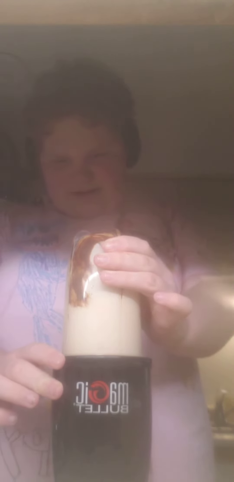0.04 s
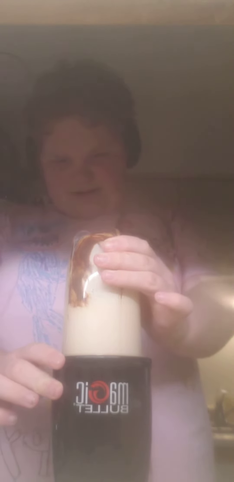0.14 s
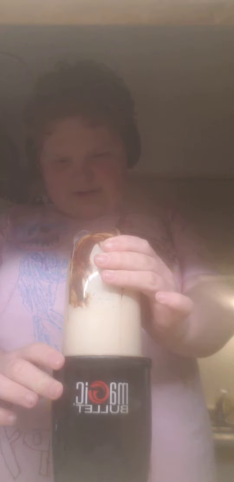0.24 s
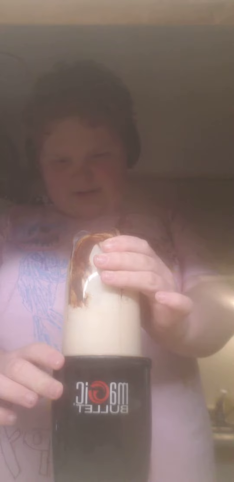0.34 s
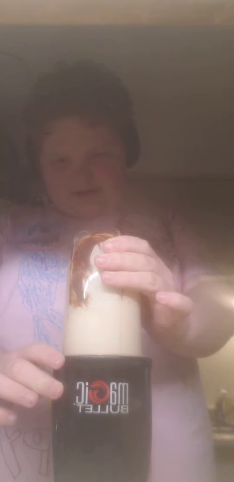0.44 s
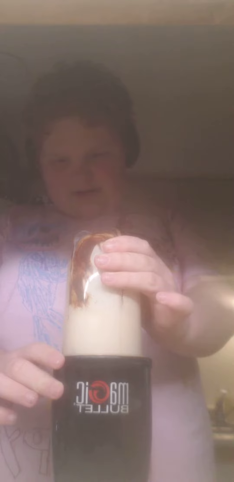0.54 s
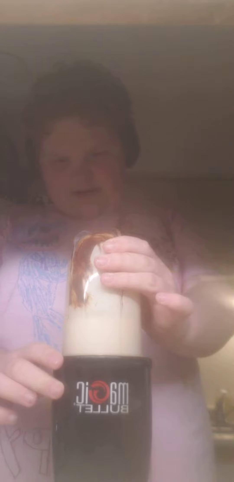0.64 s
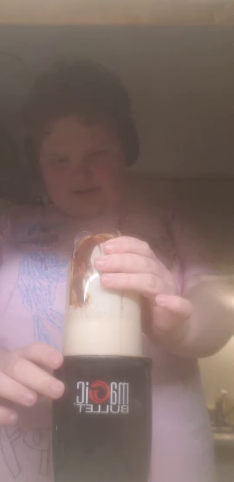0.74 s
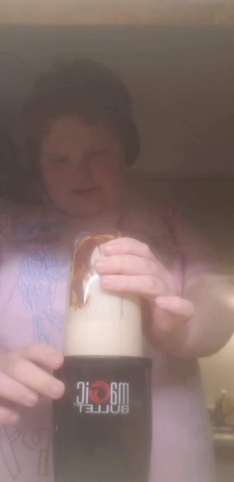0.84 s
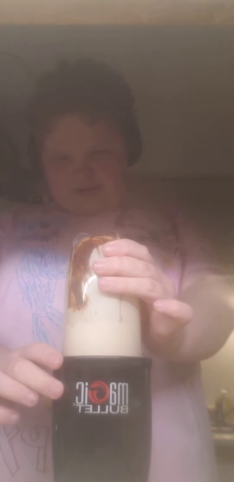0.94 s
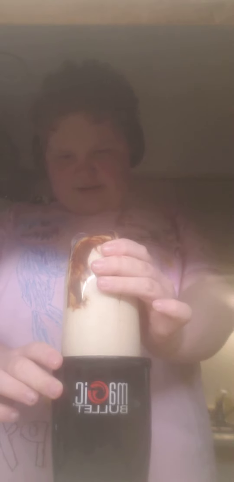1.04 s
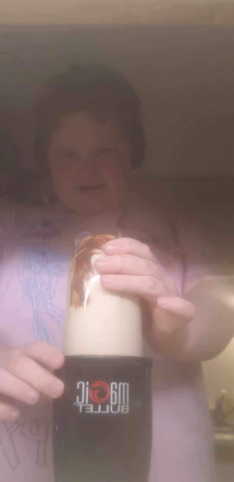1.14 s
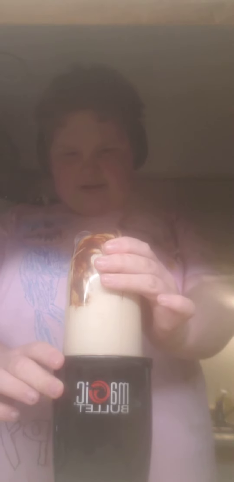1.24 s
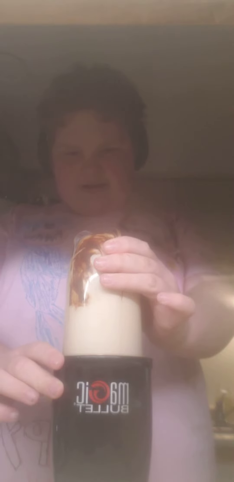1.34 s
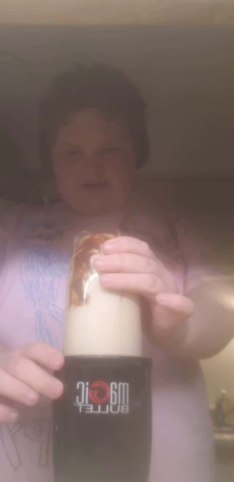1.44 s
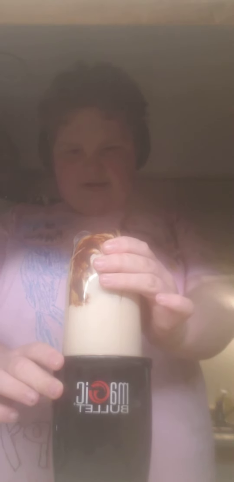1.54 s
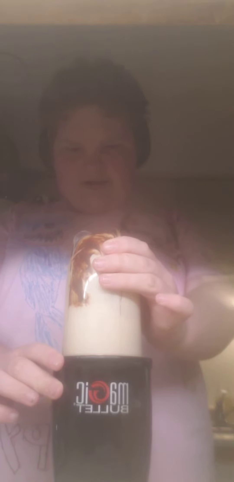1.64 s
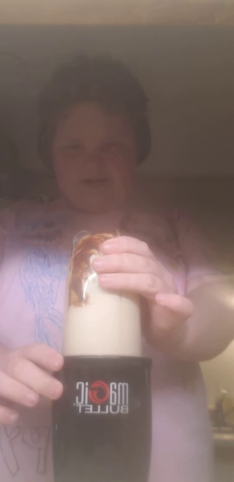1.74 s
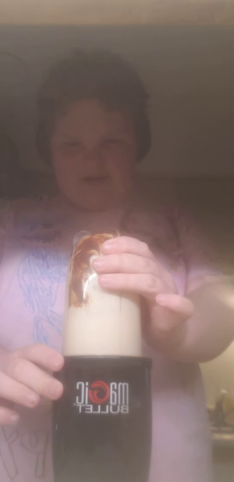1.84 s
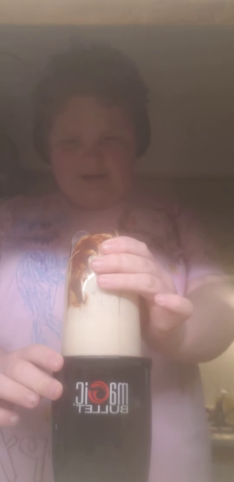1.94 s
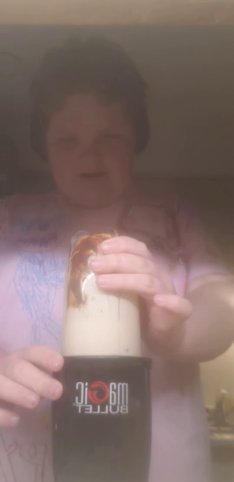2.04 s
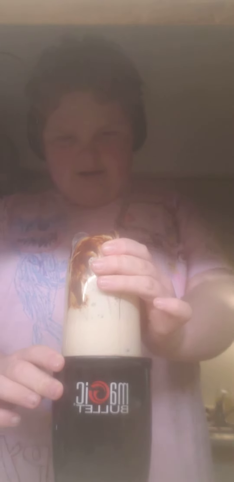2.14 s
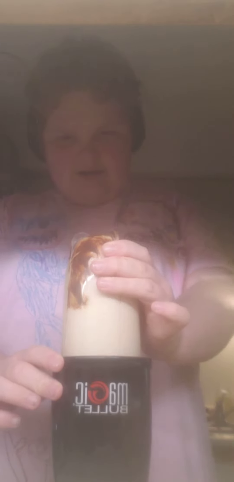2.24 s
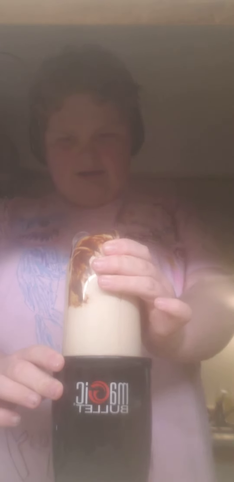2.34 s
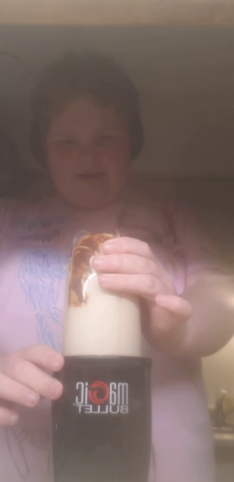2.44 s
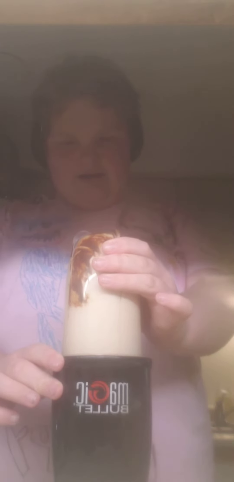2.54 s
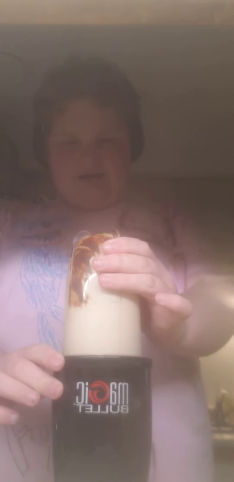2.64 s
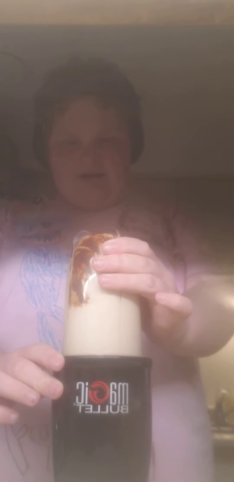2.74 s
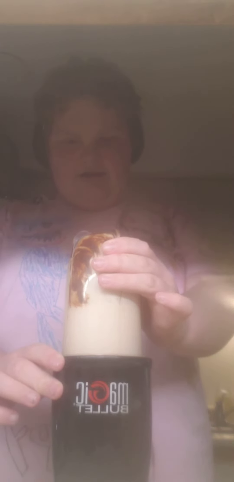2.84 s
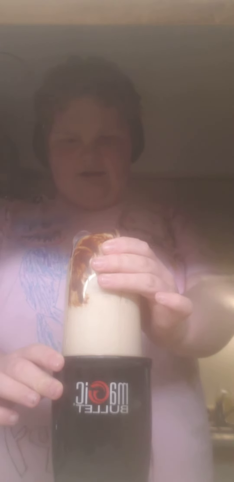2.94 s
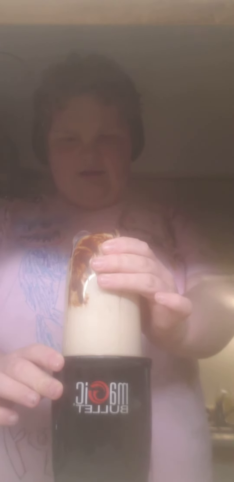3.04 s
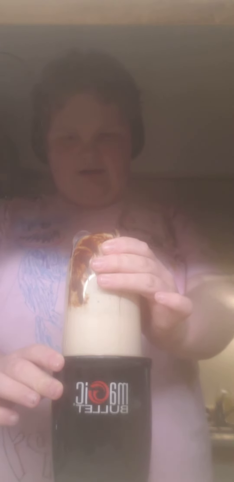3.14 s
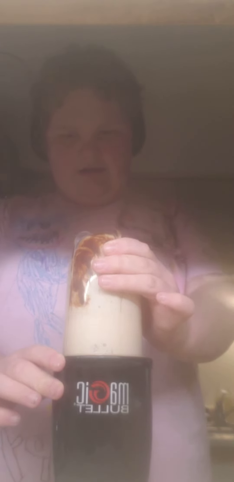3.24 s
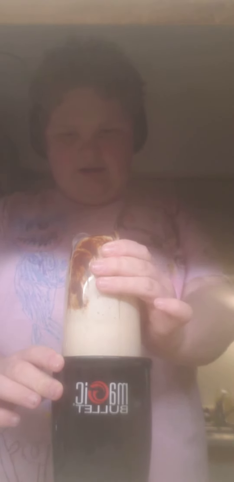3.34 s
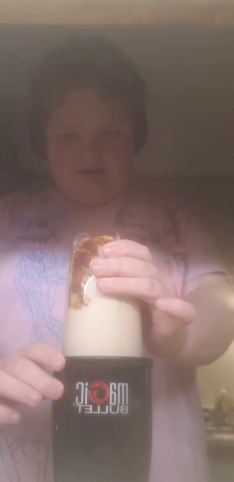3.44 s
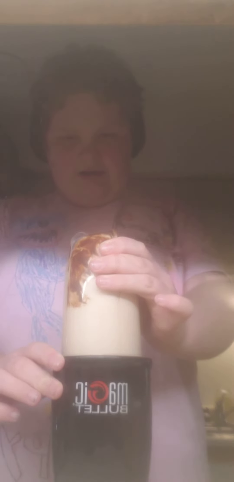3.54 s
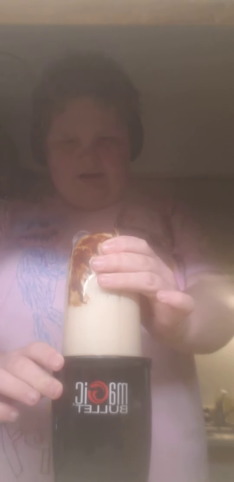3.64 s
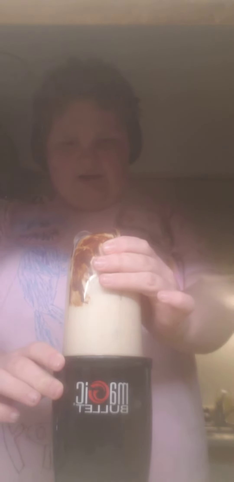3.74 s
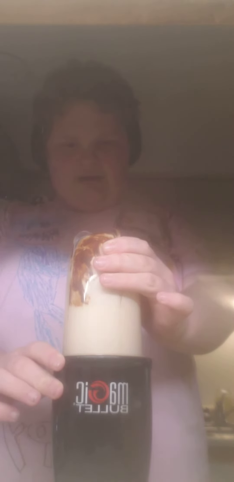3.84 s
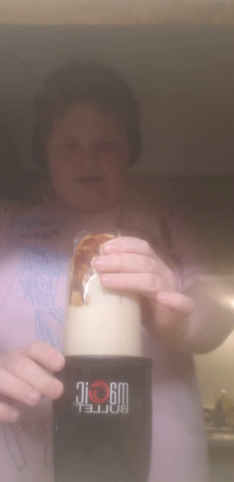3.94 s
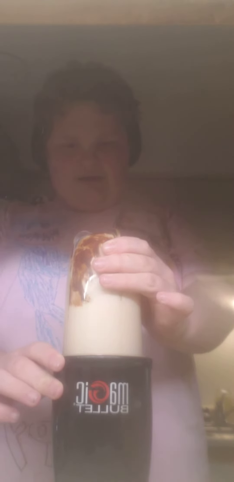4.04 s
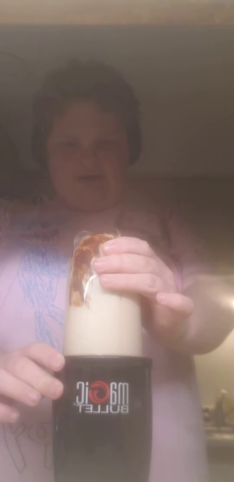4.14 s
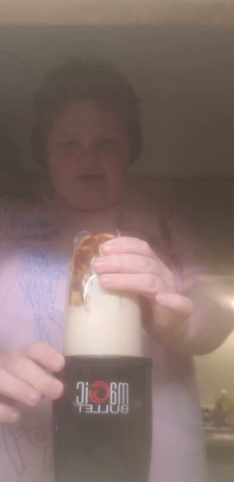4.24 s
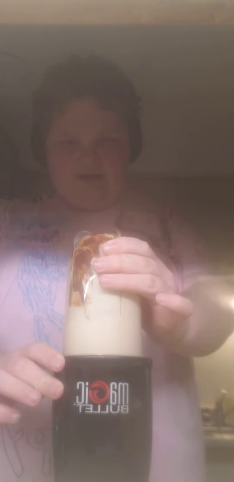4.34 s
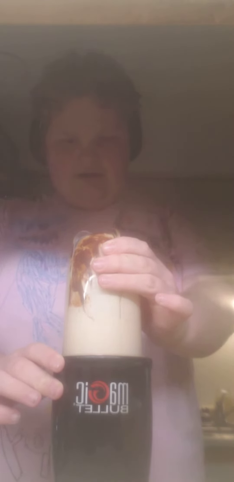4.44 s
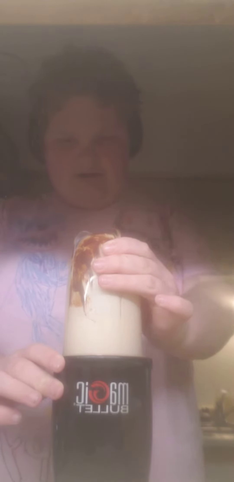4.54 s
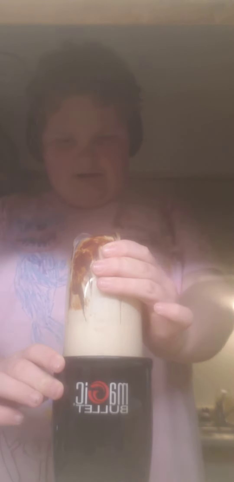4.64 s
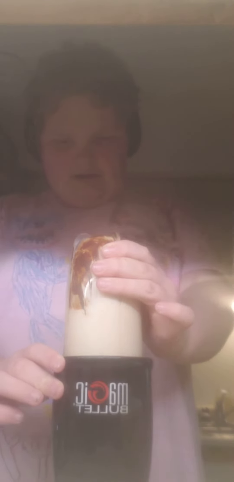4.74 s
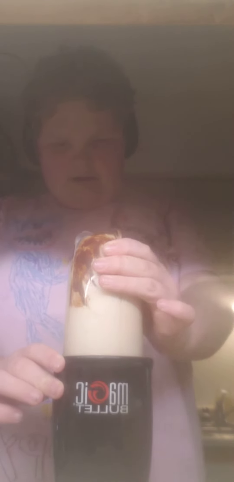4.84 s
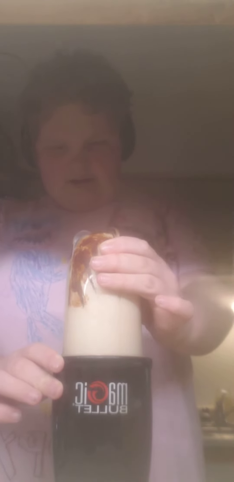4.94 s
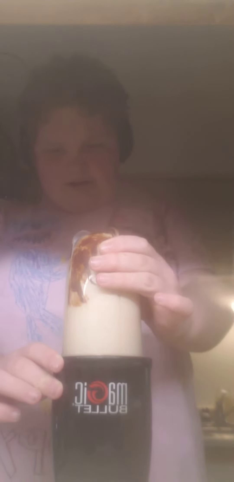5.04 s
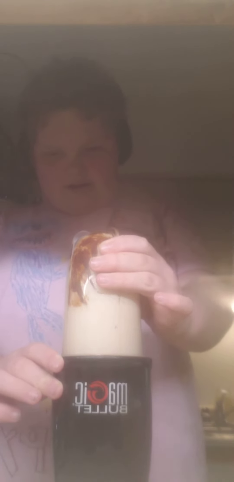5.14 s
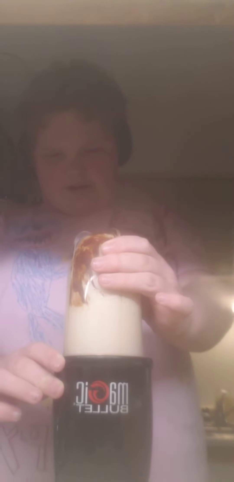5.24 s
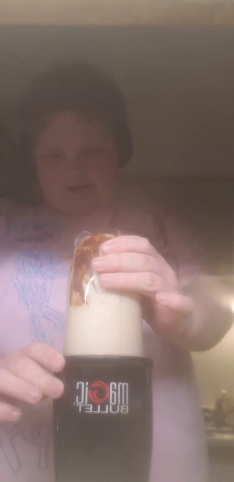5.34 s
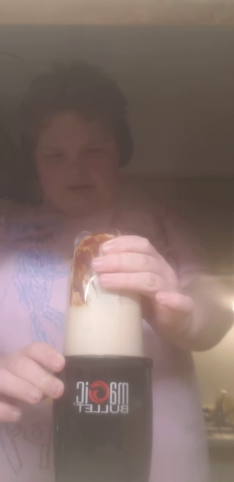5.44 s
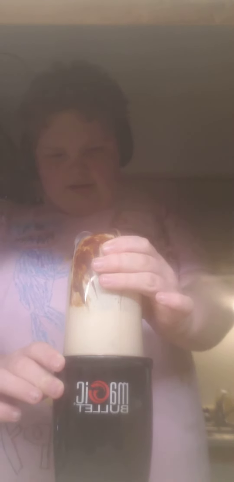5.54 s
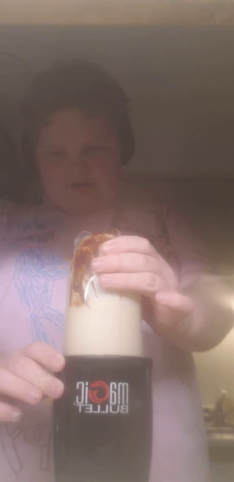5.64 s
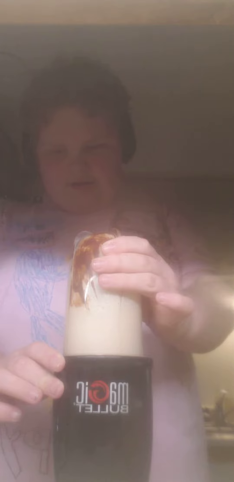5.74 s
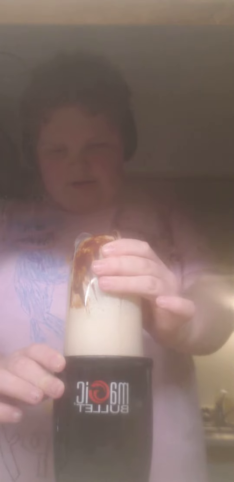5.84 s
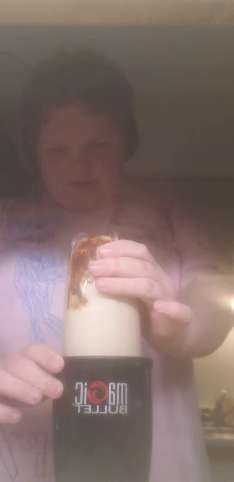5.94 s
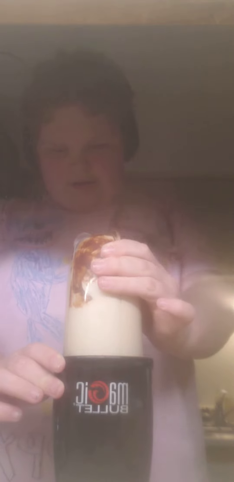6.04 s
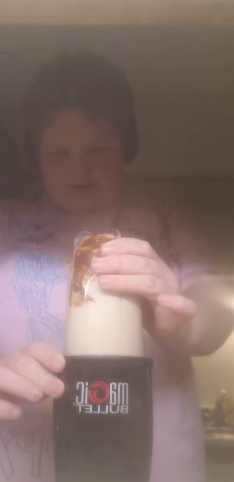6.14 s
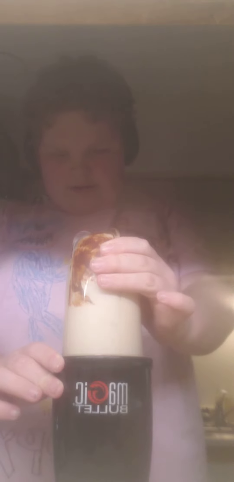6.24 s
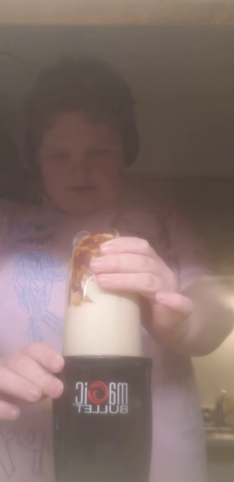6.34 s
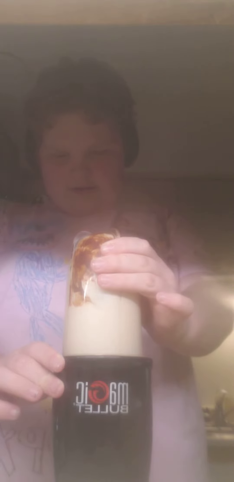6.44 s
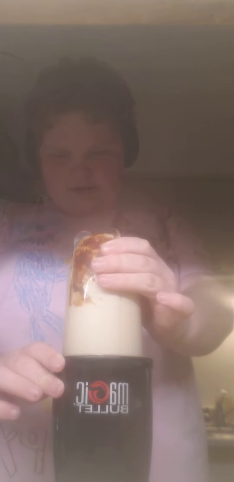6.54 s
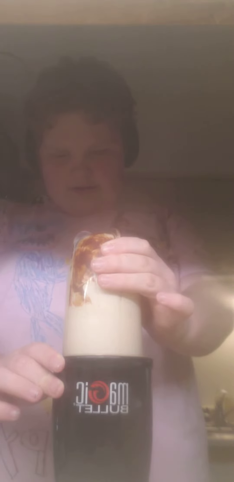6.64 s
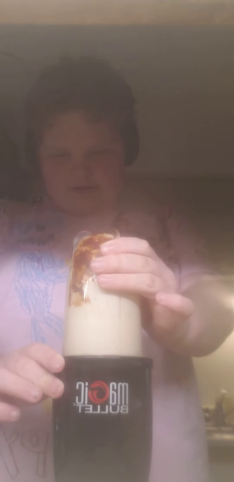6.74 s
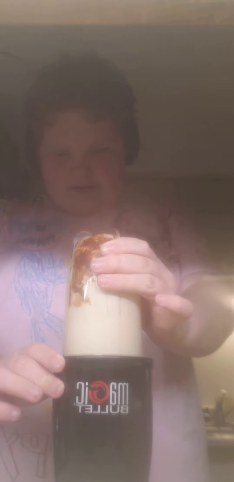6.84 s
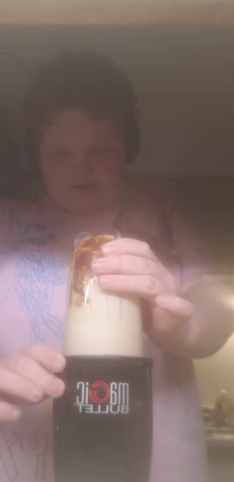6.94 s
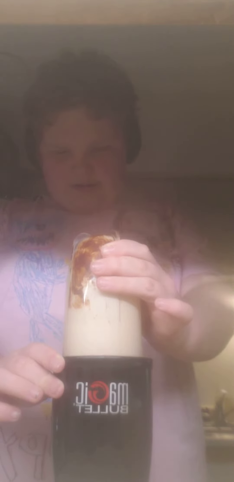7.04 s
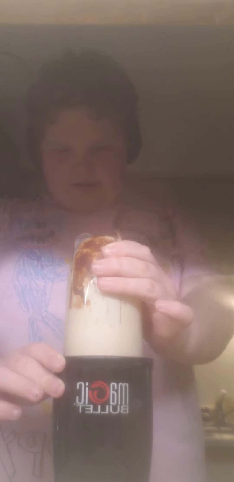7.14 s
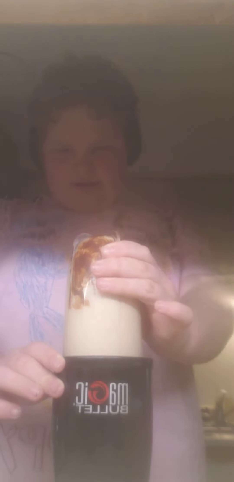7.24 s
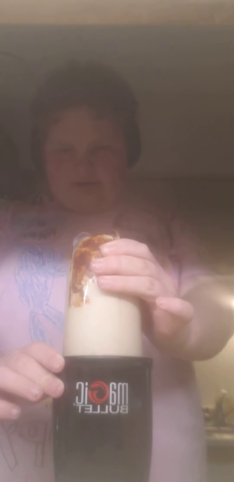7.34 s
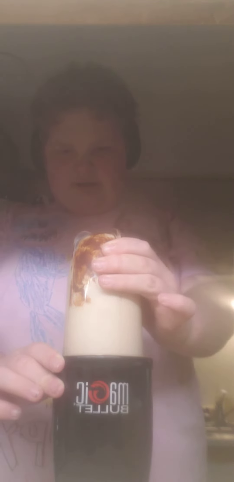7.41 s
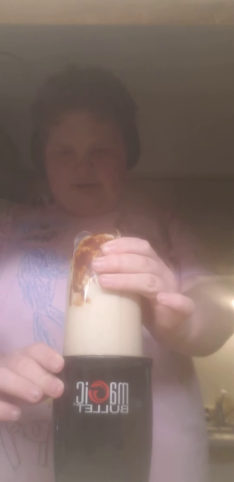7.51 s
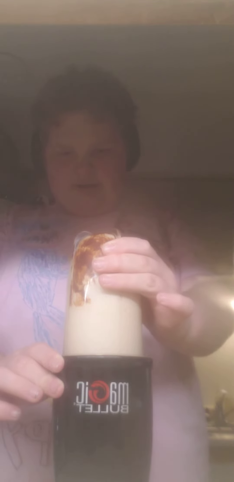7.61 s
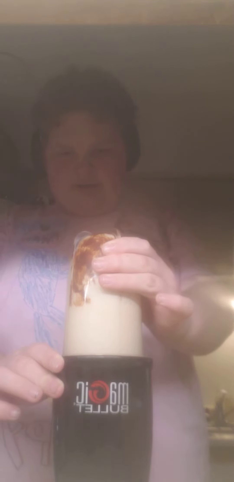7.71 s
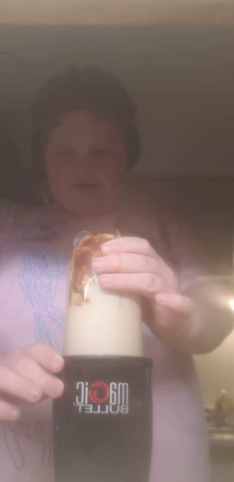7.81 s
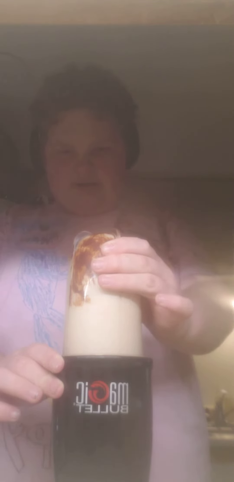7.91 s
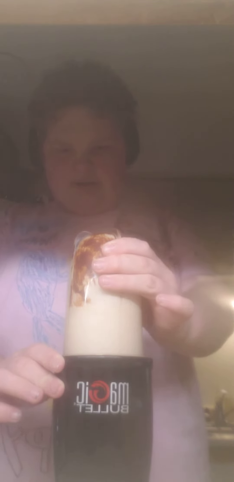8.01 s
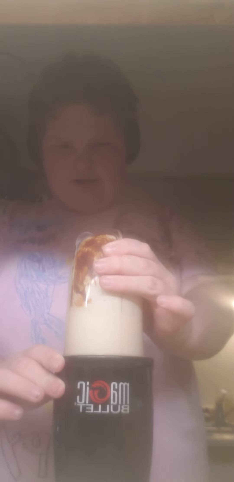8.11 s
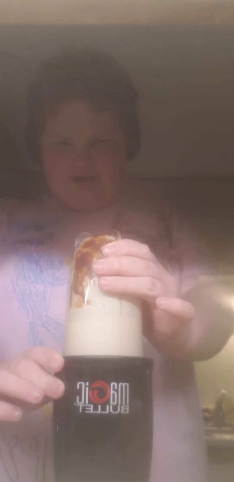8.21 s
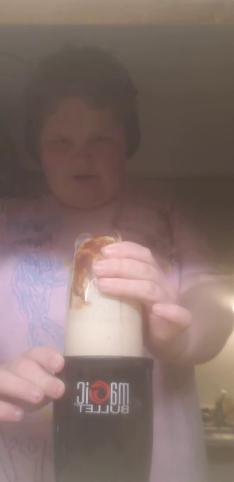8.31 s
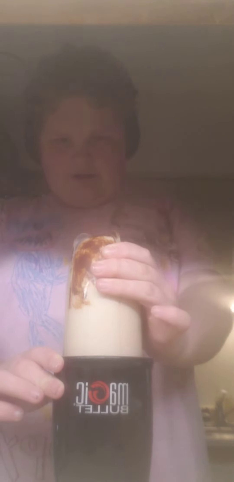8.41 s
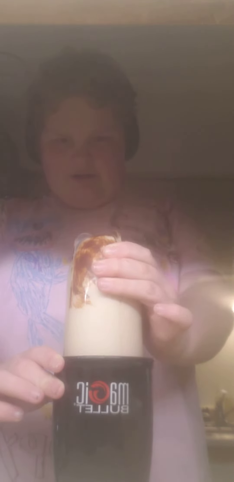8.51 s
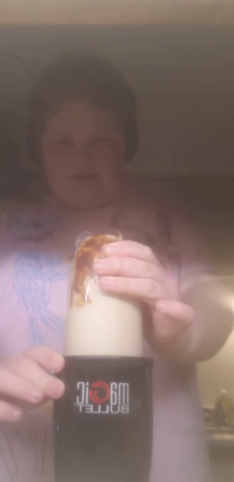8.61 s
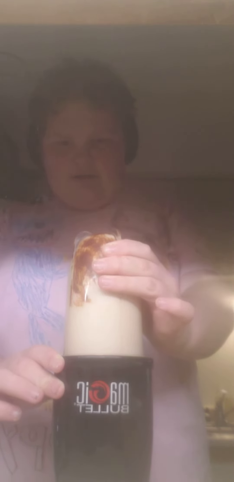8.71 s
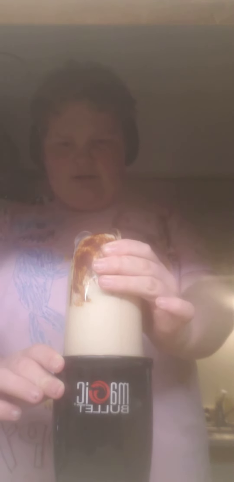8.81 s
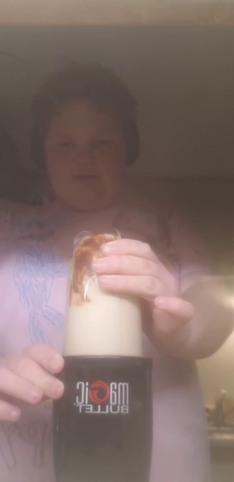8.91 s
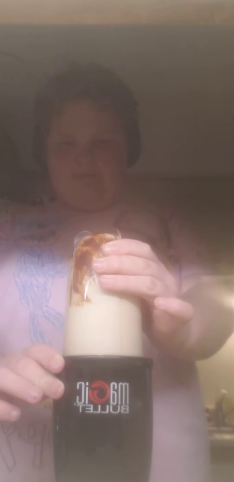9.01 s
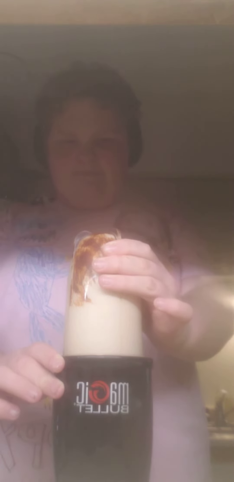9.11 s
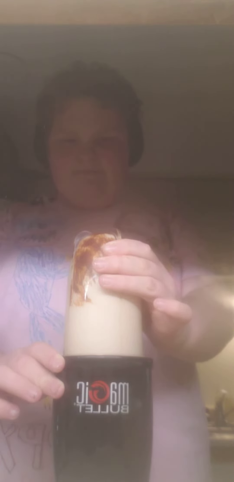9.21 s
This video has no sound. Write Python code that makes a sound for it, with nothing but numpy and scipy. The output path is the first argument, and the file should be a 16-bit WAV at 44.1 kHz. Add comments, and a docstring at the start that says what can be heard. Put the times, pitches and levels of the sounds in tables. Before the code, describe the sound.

Close up in a small, fairly dry kitchen, a small blender is pulsed on a counter. At 0 s ice is already clattering in the plastic cup, fading to loose ticks by 0.5 s. A small seating click at 0.9 s precedes the next press at 1.0 s: an abrupt gritty smash, a low counter thump, then irregular hard cracks and hollow knocks over wet, hissing, rumbling slush, while a faint low motor whirr sinks. It collapses into light ticks by about 1.8 s. The same cycle repeats at 2.2, 3.4, 4.7, 5.9, 7.2 and 8.3 s, each different; 4.7 starts softer with a deep thump, 5.9 has dense heavy cracks, 7.2 begins lighter. The last rattles on until about 9.2 s and dies away. Between bursts only settling chips and faint room hum remain.

```python
"""Pulsed blender crushing ice

A small blender on a kitchen counter is pulsed about once a second, an arm's length from a phone.
Each press bursts gritty noise through ice and cup resonances, with a decaying low sine as the base's jolt;
the blade coasts down as sinking harmonics while cubes knock (shaped noise blows) and milk and chips churn
(sparse noise over hiss). A faint sine hum and coloured noise lie behind; a short noise tail is the room."""
import sys
import numpy as np
from scipy import signal
from scipy.fft import rfft, irfft
from scipy.io import wavfile

SR = 44100
rng = np.random.default_rng(int(sys.argv[2]) if len(sys.argv) > 2 else 0)


def invert_db(level):
    """Linear amplitude ratio for a level in decibels (20 dB per decade), elementwise."""
    return 10 ** (np.asarray(level, dtype=float) / 20)


def dump_mix(stems):
    """Bounce the given channels to the path in sys.argv[1] as a 16-bit WAV at rate SR."""
    frames = np.atleast_2d(stems).T  # one column per channel
    limited = np.clip(frames, -1, 1)  # hard clip at full scale
    pcm = np.round(limited * 32767).astype(np.int16)
    wavfile.write(sys.argv[1], SR, pcm)


N = 408807
T = np.arange(N) / SR

# presses of the switch: on_s, powered_s, smash_db, jolt_db, shaft_tone_db
PRESSES = [(-.25, 0.11, -13, -19, -50), (0.987, 0.046, -11.5, -15.5, -37.5), (2.219, 0.04, -14, -21.5, -41),
           (3.371, 0.072, -11, -29, -42), (4.659, 0.063, -15, -16, -39), (5.923, 0.126, -22, -37.5, -42),
           (7.202, 0.043, -16.5, -74, -39.5), (8.343, 0.037, -12.5, -21, -46.5)]
# the hand seating the cup on its switch: start_s, crack_peak_db
CLICKS = [(0.8919, -25.5), (2.184, -26.5), (3.312, -27), (4.6162, -27.5), (5.8846, -23), (7.01, -29),
          (8.2393, -26)]
# resonances of cup, base and counter: centre_hz, width_hz, gain_db
CUP_MODES = [(70, 15, -3.5), (117.8, 4.6, 0.5), (210.6, 28.7, -4.5), (270.3, 19, -3.5), (425.8, 19.1, 4.5),
             (676, 45.6, -1.5), (886, 61, -8.5), (1378, 85, -6)]
# resonances of the thin cup wall: centre_hz, width_hz, gain_db
WALL_MODES = [(1829, 79, 5.5), (2037, 74, 6.5), (2235, 110, 7), (2576, 60, -2), (2730, 47, -3),
              (3600, 22, -17), (3608, 35, 5.5)]
# crushed-ice spectrum as the microphone colours it: freq_hz, relative_level_db
ICE_SPECTRUM = [(410, -15), (700, -13.5), (984, -17), (1360, -17.5), (1580, -22.5), (2240, -7.5),
                (5260, -11), (6150, -6.5), (8420, -27), (12300, -13.5), (16000, -27.5)]


def unit(x):
    """Scaled to rms 1."""
    return x / np.sqrt(np.mean(x ** 2))


def colour(x, points):
    """Causal (minimum-phase) filter through (Hz, dB) points, from the folded cepstrum."""
    hz, db = np.transpose(points)
    grid_hz = np.linspace(1, SR / 2, 2049)
    gain = invert_db(np.interp(np.log(grid_hz), np.log(hz), db))
    ceps = irfft(np.log(gain))
    ceps[1:2048] *= 2
    ceps[2049:] = 0
    impulse = irfft(np.exp(rfft(ceps)))
    return signal.fftconvolve(np.atleast_2d(x), impulse[None])[:, :x.shape[-1]]


def band(x, hz, width_hz):
    """One resonance, gain 1 at its centre."""
    return signal.lfilter(*signal.iirpeak(hz, hz / width_hz, SR), x)


def ring(x, modes, detune=0):
    """An object's resonances, neighbours in opposite sign; grip and filling shift each by chance."""
    out = 0
    for k, (hz, width_hz, db) in enumerate(modes):
        shifted_hz = hz * np.exp(detune * rng.standard_normal())
        out = out + (-1) ** k * invert_db(db) * band(x, shifted_hz, width_hz)
    return out


def pair(size):
    """Noise for two ports that face different parts of the cup: bass shared, treble partly their own."""
    common, side = rng.standard_normal((2, size))
    side = 0.65 * signal.lfilter(*signal.butter(1, 1200, "high", fs=SR), side)
    return common + np.array([side, -side])


def grit(per_s, spread_db, tail_s):
    """Noise chopped into random chips of very unequal size, each with a short tail."""
    starts = rng.random(N) < per_s / SR
    chips = starts * invert_db(spread_db * np.minimum(rng.exponential(size=N), 4.0))
    envelope = signal.lfilter([1], [1, -np.exp(-1 / (tail_s * SR))], chips)
    return unit(envelope * pair(N))


def ice(x, wall_db=-6, detune=0):
    """Ice on plastic: a broad crack plus the wall's ring."""
    crack = unit(colour(x, ICE_SPECTRUM))
    return unit(crack + invert_db(wall_db) * unit(ring(x, WALL_MODES, detune)))


def kitchen(room_db=-59):
    """Quiet coloured room noise and a slightly wavering appliance hum of steady partials."""
    # hum partials: freq_hz, level_db
    hum_partials = [(120, -72.5), (183.0, -61)]
    # room noise spectrum: freq_hz, relative_level_db
    room_spectrum = [(28, -37), (52, -12), (100, -21), (150, -22.5), (220, -23.5), (439, -33.5),
                     (1030, -49), (2240, -50.5), (12000, -64.5), (22000, -120)]
    waver = 1 + 0.15 * unit(band(rng.standard_normal(N), 5, 8))
    hum = sum(invert_db(db) * np.sqrt(2) * np.sin(2 * np.pi * hz * T) for hz, db in hum_partials)
    return waver * hum + invert_db(room_db) * unit(colour(pair(N), room_spectrum))


def echoes(x, t60_s=0.08, wet_db=-12, bass_cut_hz=600, swell_s=0.035):
    """Counter and walls return a dense fading tail, separate at each port and thinned in the bass."""
    t = T[:SR // 3]
    fade = np.exp(-np.log(1000) * t / t60_s) * np.minimum(t / swell_s, 1)
    tails = rng.standard_normal((2, len(t))) * fade
    tails = tails / np.sqrt(np.sum(tails[0] ** 2))
    tails = signal.lfilter(*signal.butter(1, bass_cut_hz, "high", fs=SR), tails)
    return invert_db(wet_db) * signal.fftconvolve(x, tails, axes=1)[:, :N]


def whirl(rumble_re_slush_db=1, rumble_extra_sag_db_s=6, rumble_linger=0.05):
    """Slush and rumble gains in dB: a slow sag after each press, a collapse once the whirl breaks down."""
    # coasting after each press: collapse_start_s, slush_at_press_db, sag_db_per_s, collapse_db_per_s
    coasting = [(0.374, -23.5, 27, 87), (1.517, -24, 21, 62.5), (2.902, -22.5, 27, 59),
                (4.019, -26, 10.5, 89), (5.351, -22, 20.5, 70), (6.501, -17.5, 40.5, 78),
                (7.8, -26.5, 15, 66), (8.921, -23.5, 3.5, 46.5)]
    slush_db, rumble_db = np.zeros((2, N))
    for (on_s, *_), (breaks_s, start_db, sag, collapse) in zip(PRESSES, coasting):
        sagging_s = np.minimum(T, breaks_s) - on_s
        collapse_db = collapse * np.maximum(T - breaks_s, 0)
        db = start_db - sag * sagging_s - collapse_db
        slush_db = np.where(T > on_s, db, slush_db)
        # the heavy cubes' rumble escapes a share of the collapse
        heavy_db = db + rumble_re_slush_db - rumble_extra_sag_db_s * sagging_s + rumble_linger * collapse_db
        rumble_db = np.where(T > on_s, heavy_db, rumble_db)
    return slush_db, rumble_db


def churn(rattle_db=-2, hiss_db=-6, settle=0.067, splinter_db=-11, splinter_hz=7000, linger=0.31, clonk_db=-12):
    """Chips crackle on the blade and rattle the wall over hissing milk; their weight rumbles the cup's body."""
    slush_db, rumble_db = whirl()
    fall_db = slush_db - slush_db.max()
    crackle, rattle = grit(300, 3.0, 0.004), grit(90, 2.2, 0.0027)
    # as the whirl dies the milk falls quiet sooner than the chips
    hiss = invert_db(hiss_db + settle * fall_db) * pair(N)
    # small lumps strike the wall at different spots, each waking one resonance
    pings = sum(invert_db(db) * unit(band(grit(80, 2.0, 0.001), hz, 2.5 * width_hz))
                for hz, width_hz, db in WALL_MODES)
    slush = ice(crackle + hiss) + invert_db(rattle_db - 0.04 * fall_db) * unit(pings)
    # tiny splinters tick only in the treble and outlast the whirl
    splinters = signal.lfilter(*signal.butter(2, splinter_hz, "high", fs=SR), grit(60, 3.2, 0.005))
    slush = slush + invert_db(splinter_db - linger * fall_db) * unit(colour(splinters, ICE_SPECTRUM))
    rumble = unit(ring(rattle + 1.3 * grit(55, 1.8, 0.014), CUP_MODES))
    # settling cubes clonk the cup now and then, lasting as long as the splinters
    clonks = invert_db(clonk_db - linger * fall_db) * unit(ring(grit(30, 3.0, 0.0059), CUP_MODES[-4:]))
    return invert_db(slush_db) * (slush + clonks) + invert_db(rumble_db) * rumble


def blows(count, over_db=9, spread_db=4, body_db=-18, body_spread_db=14):
    """All blows as (s, crack peak dB, cup body dB re crack, thin or not), small lumps at chance moments."""
    # single ice knocks on blade and cup, loud in the whirl and faint as it settles:
    # start_s, crack_peak_db, body_re_crack_db
    cubes = [(0.0226, -4, -11), (0.0539, -9, -3), (0.0908, -2.5, -9.5), (0.1359, -1.5, -12.5),
             (0.179, -4, -12.5), (0.2431, -7.5, -5), (0.2565, -1, -34.5), (0.2979, 1.5, -13.5),
             (0.3388, -7.5, -16), (0.4171, -19.5, -11), (0.5109, -24, -5), (0.603, -26, -8),
             (0.371, -15.5, -8.5), (0.698, -51.5, 9.5), (1.1682, -6, -38), (1.1932, -4, -24),
             (1.2266, -8, -2), (1.2335, 3, -10.5), (1.292, -10, -7), (1.27, -6, -42), (1.324, -4, -37),
             (1.3892, -3.5, -12), (1.4393, -7, -9), (1.4624, -3.5, -3), (1.472, 6, -22.5), (1.493, 2, -13),
             (1.5185, -2, -14.5), (1.6322, -12.5, -5.5), (1.6835, -11.5, -13), (1.705, -12, -11.5),
             (1.7268, -17.5, -9), (1.757, -19.5, -28), (1.7883, -19, -12), (1.8906, -24, -9),
             (2.4603, 2.5, -9), (2.537, -8, -28), (2.5813, -6.5, -13), (2.643, -2, -14),
             (2.666, -0.5, -7.5), (2.696, -5, -12), (2.8193, -5, -1), (2.8416, 1, -16), (2.8813, -11, -17),
             (2.9188, -6.5, -8.5), (2.9787, -16, -14), (3.0119, -18, -3), (3.1009, -31, -5),
             (3.1403, -23.5, -13.5), (3.1673, -19.5, -20), (3.1892, -32, -0.5), (2.508, -9.5, -7),
             (2.758, -16.5, -34), (2.943, -16, -27), (3.029, -15.5, -9), (3.6279, -5.5, -7),
             (3.715, -5.5, -28.5), (3.7614, -6, -15.5), (3.8047, -1.5, -32.5), (3.8785, -4.5, -6.5),
             (3.9224, 1.5, -16.5), (3.934, -4, -7.5), (3.9991, 2, -9.5), (4.024, -3.5, -17),
             (4.0837, -12.5, -36), (4.1495, -16, -18.5), (4.1889, -16, -10.5), (4.2551, -21.5, -5.5),
             (4.173, -15.5, -7), (4.6937, -14, 8), (4.8703, -12.5, 0.5), (4.9651, -7, -7.5),
             (4.976, -2, -9), (4.997, -6.5, -10.5), (5.0664, -8.5, -4.5), (5.0996, -4, -19),
             (5.18, -12.5, -3.5), (5.2348, -6, -14), (5.2883, -2.5, -6.5), (5.3686, -1.5, -11),
             (5.39, -2.5, -13.5), (5.5255, -22, -5), (5.6106, -15.5, -10.5), (5.70, -45, 10.5),
             (5.815, -54.5, 7), (5.939, 1.5, -14.5), (5.993, 0.5, -16), (6.0197, 5.5, -13.5),
             (6.0888, 3, -33.5), (6.1104, 5, -36), (6.125, -2, -11.5), (6.1972, 4, -15.5),
             (6.3495, 0.5, -22), (6.4656, -1.5, -12.5), (6.5234, -5, -27.5), (6.6685, -27.5, -7),
             (6.558, -20.5, -22), (6.8117, -34, -13), (7.258, -25, 8), (7.338, -9.5, -28),
             (7.442, -11, -12), (7.4614, -7.5, -10), (7.4985, -11.5, -29), (7.5333, -8, -18),
             (7.6411, -2, -11.5), (7.6853, -6, -35), (7.8036, -0.5, -17), (7.8525, 1, -17.5),
             (7.9046, -12.5, -17), (7.9603, -19, -16), (8.07, -25.5, -10), (8.2008, -29, -7.5),
             (8.449, -8, -10), (8.52, -7, -2.5), (8.5381, 1, -6), (8.5709, 0.5, -8.5), (8.5896, 0, -14),
             (8.6297, -2, -7), (8.64, 0, -28), (8.653, -2.5, -22), (8.762, -5, -24), (8.8004, -5, -11.5),
             (8.819, -9.5, -26), (8.8564, -2.5, -24.5), (8.8768, 3, -11), (8.9108, -0.5, -11),
             (9.0229, -9, -5.5), (9.1178, -4, -11.5), (9.2335, -21, -26)]
    # thin splinter ticks as the whirl settles: start_s, crack_peak_db
    thin_ticks = [(.545, -43), (2.05, -40), (2.108, -38), (3.2482, -23), (4.113, -18), (4.3482, -38.5),
                  (6.615, -43), (6.7563, -29.5), (8.005, -20)]
    # the blade's first bite at each press: start_s, crack_peak_db
    first_bites = [(0.9903, -1), (2.2227, 3.5), (3.3768, 0), (4.661, -10.5), (5.927, -1.5), (7.2082, -12),
                   (8.3485, 2)]
    click_body_db, bite_body_db, tick_body_db = -12, -39, -40
    contact_lead_s, contact_db = 0.014, -26.5  # the switch contact ticks just before the bite

    when, size, weight = rng.random((count, 3)).T
    slush_db = whirl()[0][(when * N).astype(int)]
    lump_db = slush_db + over_db + spread_db * (2 * size - 1)
    lump_body_db = body_db + body_spread_db * (2 * weight - 1)
    lumps = np.array([when * T[-1], lump_db, lump_body_db]).T

    clicks = [(s, db, click_body_db) for s, db in CLICKS]
    contacts = [(s - contact_lead_s, contact_db, click_body_db) for s, _ in first_bites]
    bites = [(s, db, bite_body_db) for s, db in first_bites]
    full = list(cubes) + clicks + contacts + bites + list(lumps)
    return [(*row, False) for row in full] + [(s, db, tick_body_db, True) for s, db in thin_ticks]


def knocks(shrink=0.17, dull_hz=8500, snap_s=0.001, snap_db=6, fade_at_0db_s=0.012, tail_s=0.098,
           tail_db=-18, push_s=0.00041, pitch_db=2, thin_above_hz=2300):
    """Each blow: a snap, a splintering burst with a chance pitch, and a push into the cup's body."""
    out, t = np.zeros((2, N + 3200)), T[:3200]
    for s, db, body_db, thin in blows(count=70):
        # light blows are over sooner; within a blow the ice gives way in uneven steps
        steps = invert_db(6.0 * np.repeat(rng.standard_normal(40), 80))
        snap = invert_db(snap_db) * np.exp(-t / snap_s)
        splintering = steps * np.exp(-(t / (fade_at_0db_s * invert_db(shrink * db))) ** 2)
        tail = invert_db(tail_db) * np.exp(-t / tail_s) * (1 - t / t[-1])
        shape = snap + splintering + tail

        split = pair(len(t)) * shape
        pitch_hz = 2400 * np.exp(0.16 * rng.standard_normal())
        burst = ice(split, detune=0.1) + invert_db(pitch_db) * unit(band(split, pitch_hz, 0.4 * pitch_hz))
        # some faces meet flat and dull, others edge-on and bright
        top_hz = min(dull_hz * np.exp(0.4 * rng.standard_normal()), 0.45 * SR)
        if thin:
            edge = signal.butter(2, thin_above_hz, "high", fs=SR)
        else:
            edge = signal.butter(1, top_hz, fs=SR)
        burst = signal.lfilter(*edge, burst)

        push = t * np.exp(-t / push_s) / push_s
        body = ring(push + 6.7 * pair(len(t)) * shape, CUP_MODES, detune=0.06)
        blow = burst / np.abs(burst).max() + invert_db(body_db) * body / np.abs(body).max()
        i = int(s * SR)
        out[:, i:i + len(t)] += invert_db(db) * blow
    return out[:, :N]


def thud(t, db, hz=66, swing_s=0.014):
    """The counter jolted at t = 0: a low sine that swings up slowly and dies away."""
    return invert_db(db) * np.e * t / swing_s * np.exp(-t / swing_s) * np.sin(2 * np.pi * hz * t)


def motor(bite_s=0.0072, release_s=0.016, jolt_early_s=0.025, second_db=-3, body_db=-6,
          top_hz=190, slowing_hz_per_s=305):
    """Power on: the blade smashes settled ice and the base jolts the counter; then the shaft tone sinks."""
    # when the blade stands still after each press: stop_s
    standstill = [.5, 1.71, 2.96, 4.13, 5.47, 6.6, 7.93, 9.19]
    power, jolt, shaft_hz, tone = np.zeros((4, N))
    for (on_s, powered_s, smash_db, jolt_db, tone_db), stop_s in zip(PRESSES, standstill):
        t = np.maximum(T - on_s, 0)
        release = np.exp(-np.maximum(t - powered_s, 0) / release_s)
        power += invert_db(smash_db) * (1 - np.exp(-(t / bite_s) ** 2)) * release
        # the base kicks back as power drops
        jolt += thud(np.maximum(t - powered_s + jolt_early_s, 0), jolt_db)
        spin_up_hz = top_hz * np.minimum(t / powered_s, 1)
        coast_hz = slowing_hz_per_s * np.maximum(stop_s - T, 0)  # drag in the milk
        shaft_hz = np.where(t > 0, np.minimum(spin_up_hz, coast_hz), shaft_hz)
        tone = np.where(t > 0, invert_db(tone_db), tone)
    for s, db in CLICKS:  # seating the cup thuds the counter
        jolt += thud(np.maximum(T - s, 0), db - 17)
    # ice drags the blade unevenly
    shaft_hz *= 1 + 0.02 * unit(band(rng.standard_normal(N), 10, 20))
    phase = 2 * np.pi * np.cumsum(shaft_hz) / SR
    # the unbalanced shaft shakes hardest while passing the base's soft mounting
    shake = tone / (1 + ((shaft_hz - 115) / 50) ** 2) * np.minimum(shaft_hz / 60, 1)
    wobble = 1 + 0.4 * unit(band(rng.standard_normal(N), 15, 30))
    whirr = shake * wobble * (np.sin(phase) + invert_db(second_db) * np.sin(2 * phase))
    chips = grit(450, 2.0, 0.003)
    smash = ice(chips) + invert_db(body_db) * unit(ring(chips, CUP_MODES[-5:]))
    return power * smash + jolt + whirr


def scene():
    """The left port hears the blender a little behind the right, by a phase that depends on pitch."""
    # left port re right: freq_hz, gain_db
    left_gain = [(100, -.4), (350, -2.5), (1400, -.7), (6000, 0), (9000, -4), (13000, -10)]
    # left port behind right: freq_hz, phase_lag_rad
    left_lag = [(60, 0), (300, .85), (800, .7), (1400, 1.9), (1900, 1.1), (2350, .1), (3200, .4),
                (3500, 2.0), (4300, .3), (5500, 1.6)]
    blender = knocks() + churn() + motor()
    left, right = blender + echoes(blender)
    lag_rad = np.interp(np.fft.rfftfreq(N, 1 / SR), *np.transpose(left_lag))
    late = irfft(rfft(left) * np.exp(-1j * lag_rad), N)
    return np.array([colour(late, left_gain)[0], right]) + kitchen()


def band_limit(x):
    """A steep low-pass at the top of the band."""
    return signal.sosfilt(signal.butter(12, 16970, fs=SR, output="sos"), x)


def record(dry):
    """The phone cuts the deepest bass and the very top, and rounds the loudest peaks."""
    bass_cut = signal.butter(4, 44, "high", fs=SR, output="sos")
    top_cut = signal.ellip(8, 0.2, 50, 15950, fs=SR, output="sos")
    x = signal.sosfilt(bass_cut, dry)
    x = 0.9 * np.tanh(x / 0.9)
    mix = signal.sosfilt(top_cut, x)
    return band_limit(mix)


dry = scene()
out = record(dry)
dump_mix(out)
```